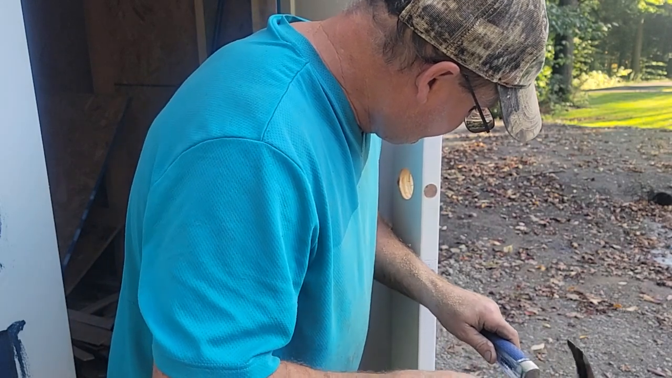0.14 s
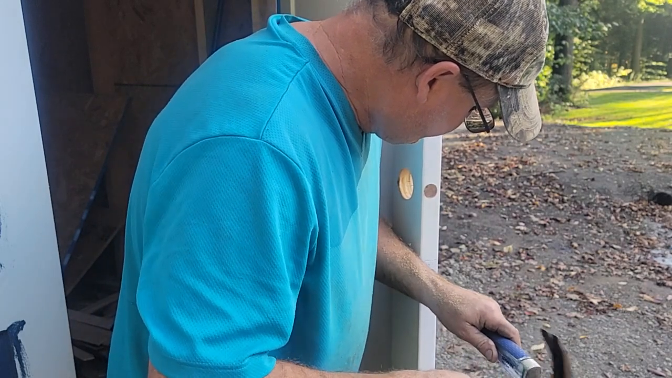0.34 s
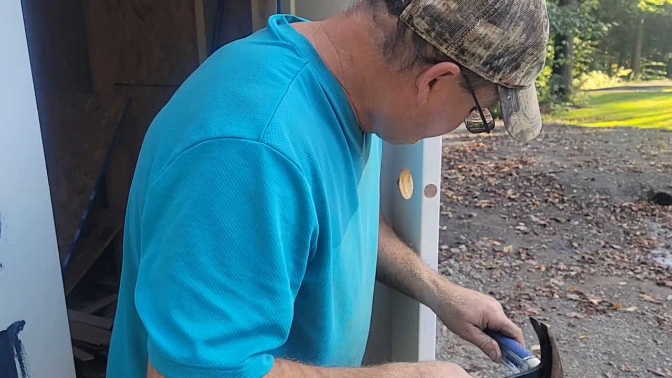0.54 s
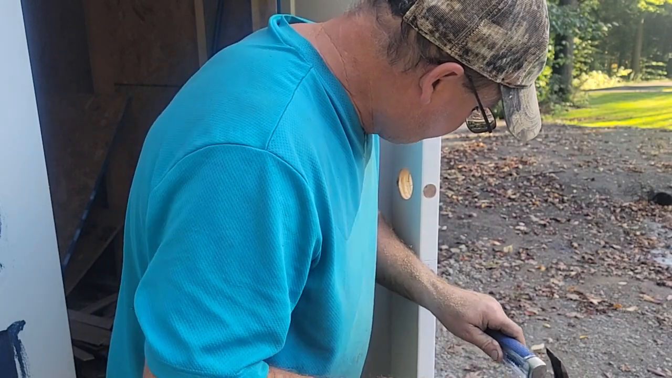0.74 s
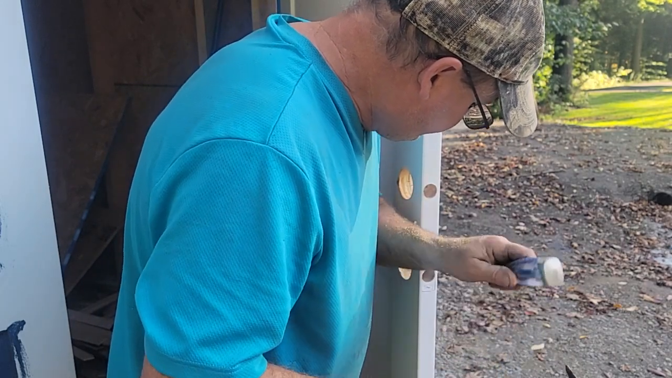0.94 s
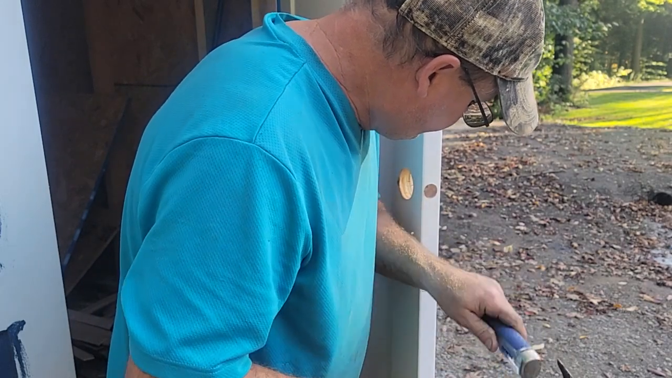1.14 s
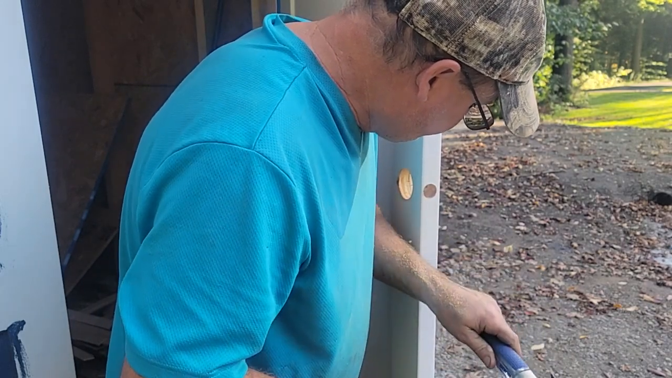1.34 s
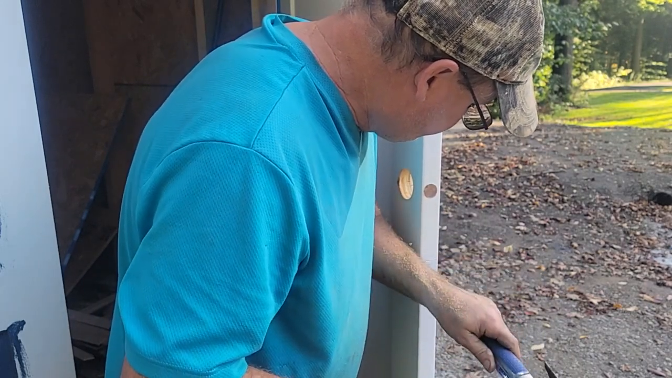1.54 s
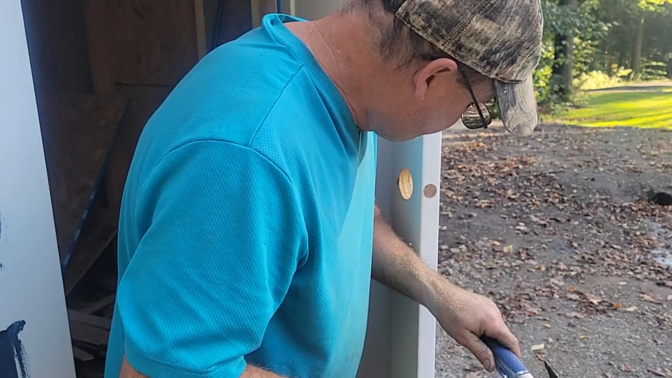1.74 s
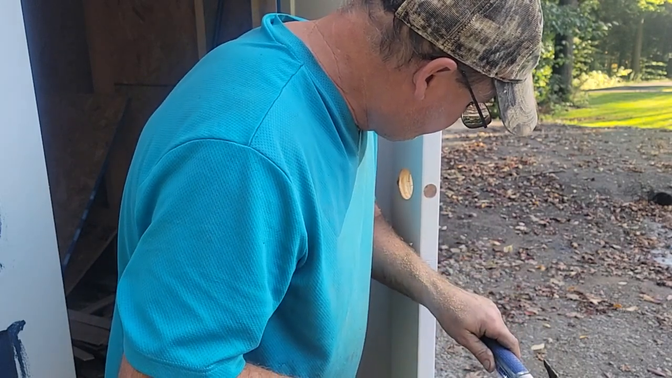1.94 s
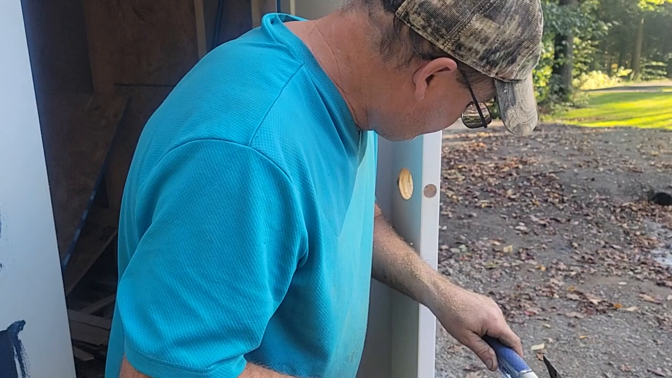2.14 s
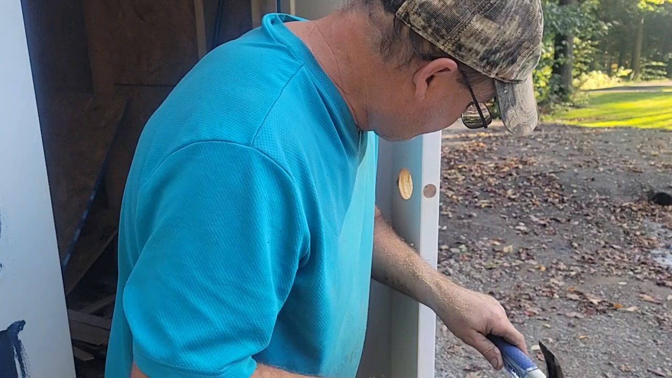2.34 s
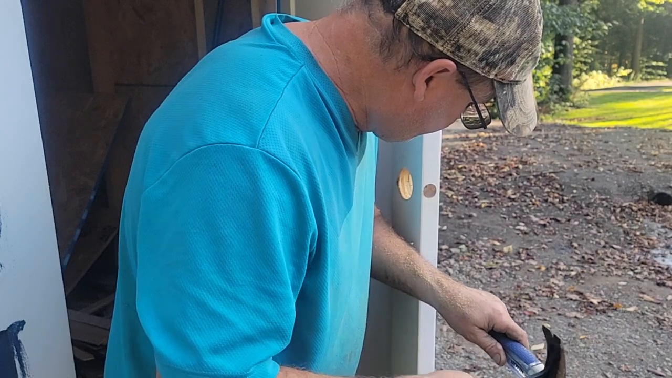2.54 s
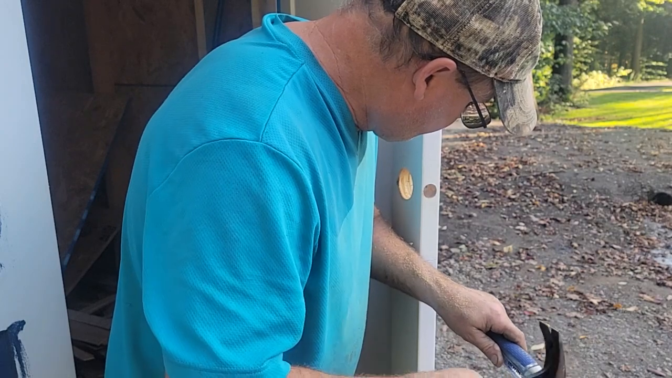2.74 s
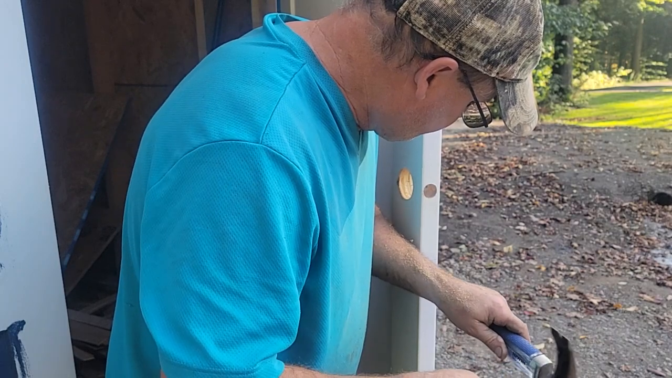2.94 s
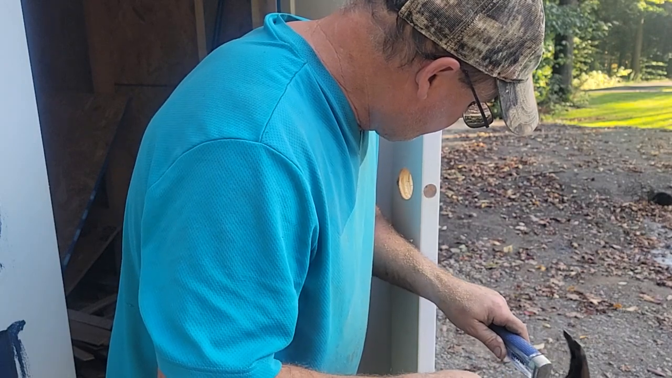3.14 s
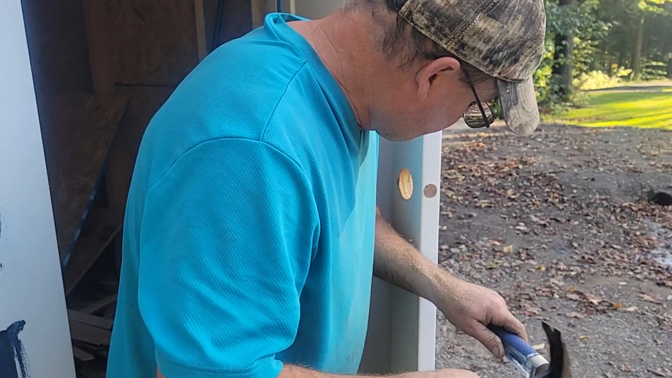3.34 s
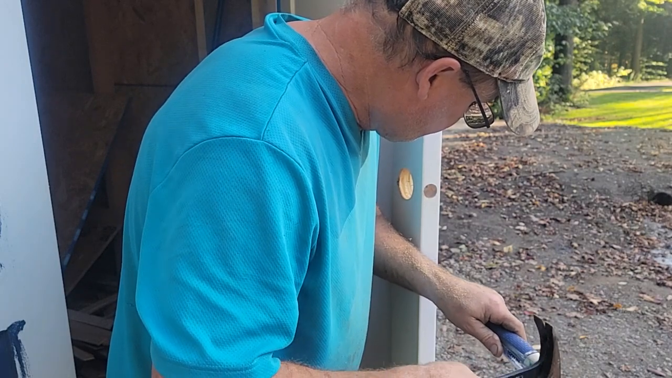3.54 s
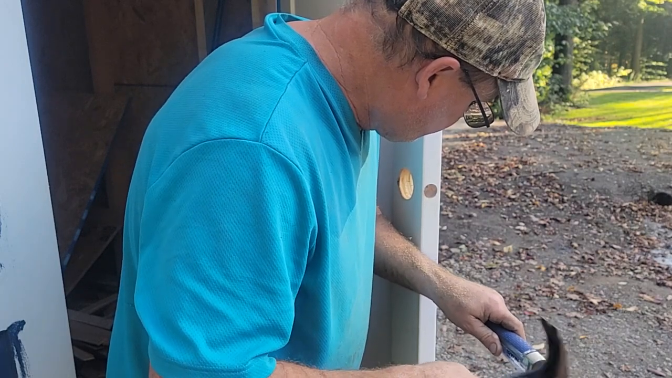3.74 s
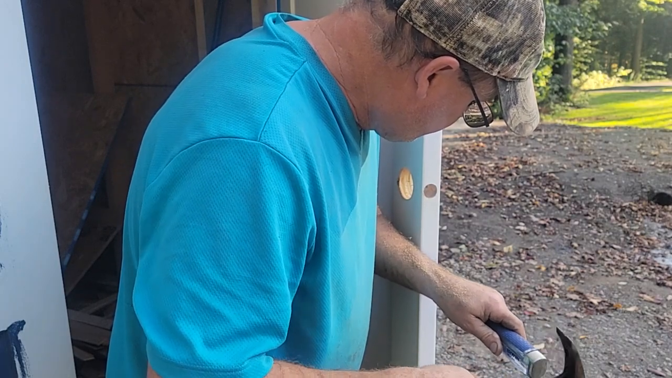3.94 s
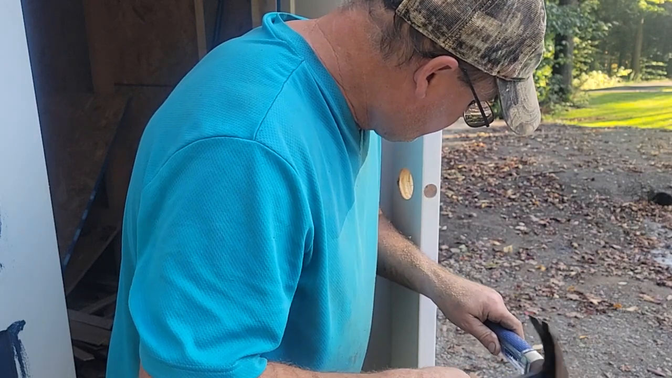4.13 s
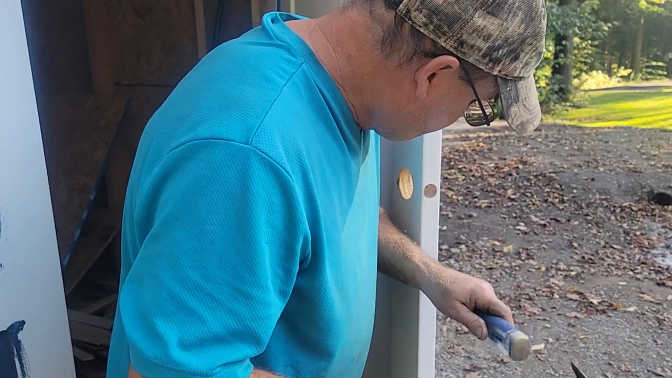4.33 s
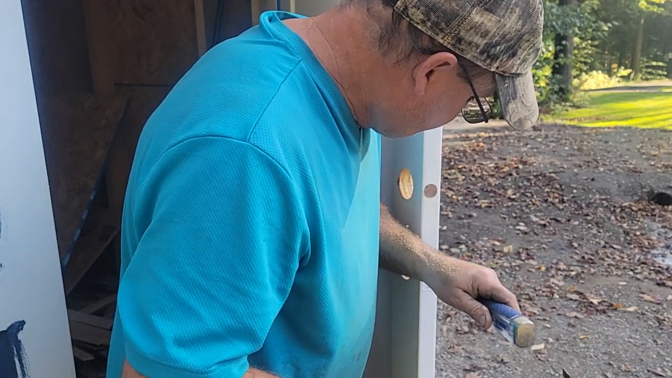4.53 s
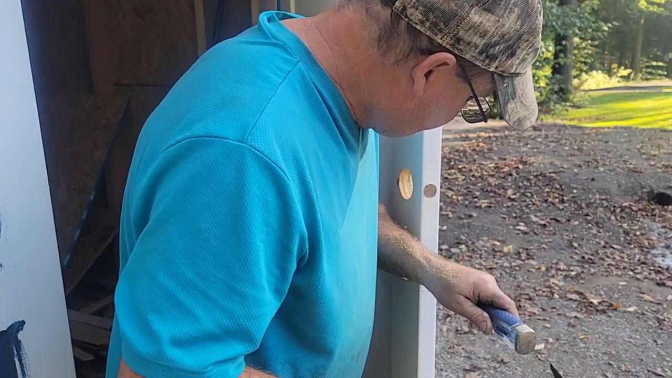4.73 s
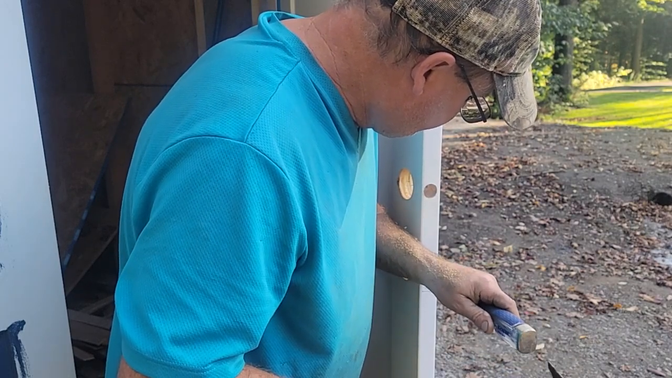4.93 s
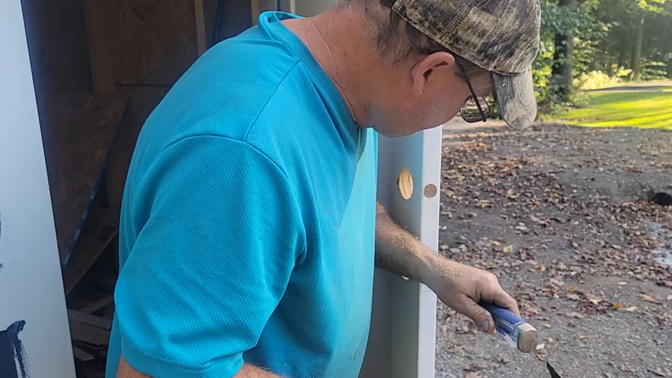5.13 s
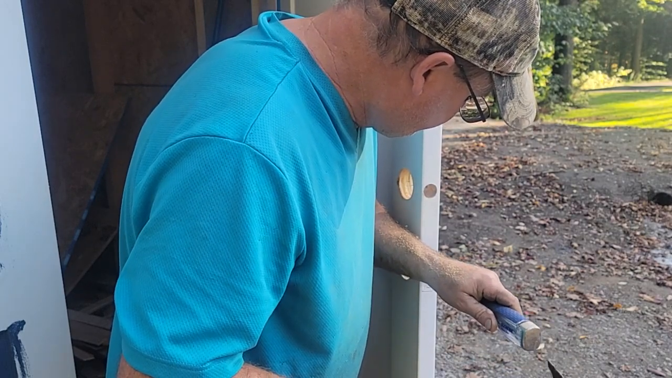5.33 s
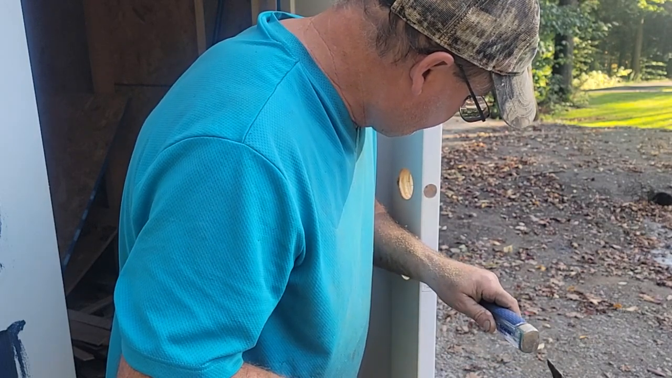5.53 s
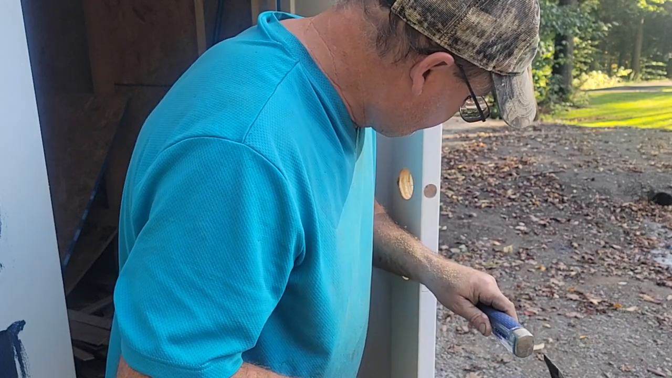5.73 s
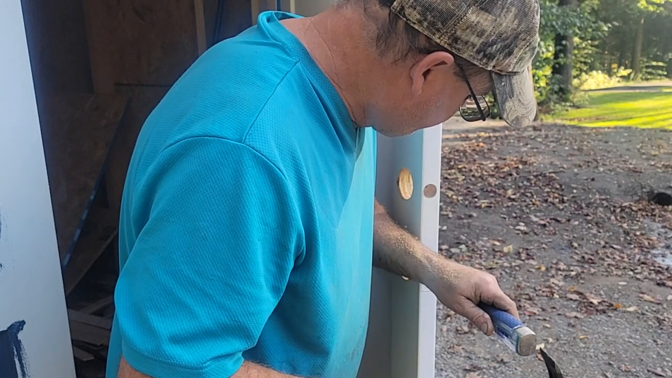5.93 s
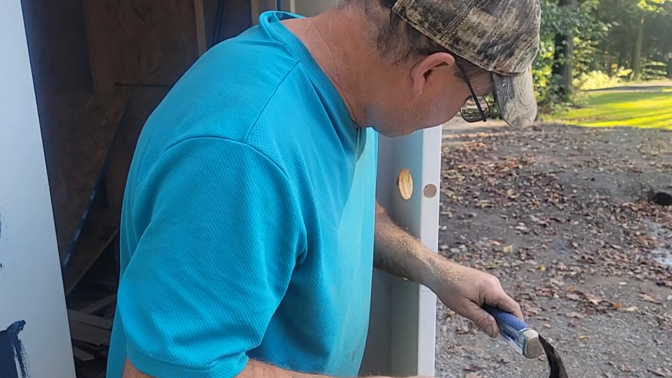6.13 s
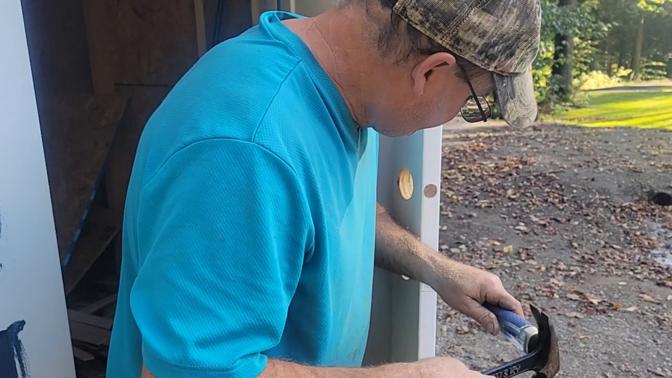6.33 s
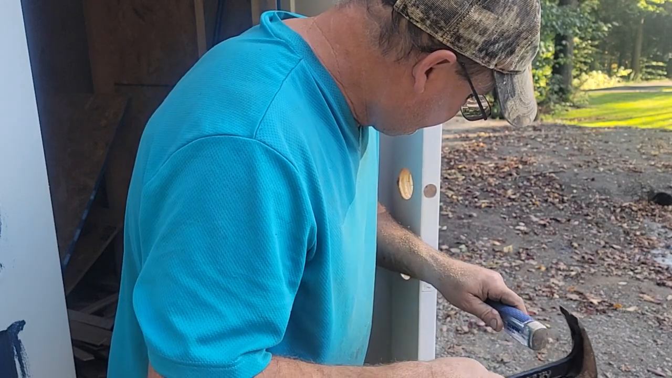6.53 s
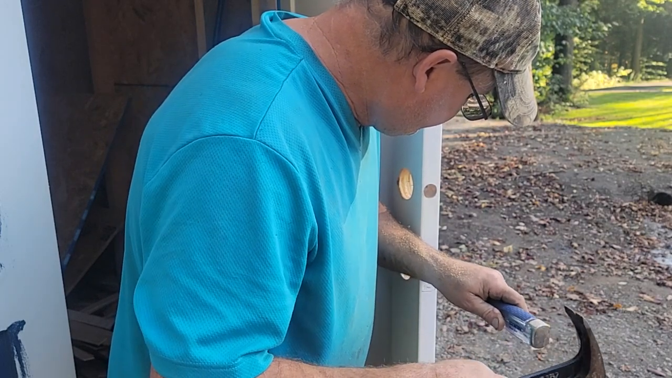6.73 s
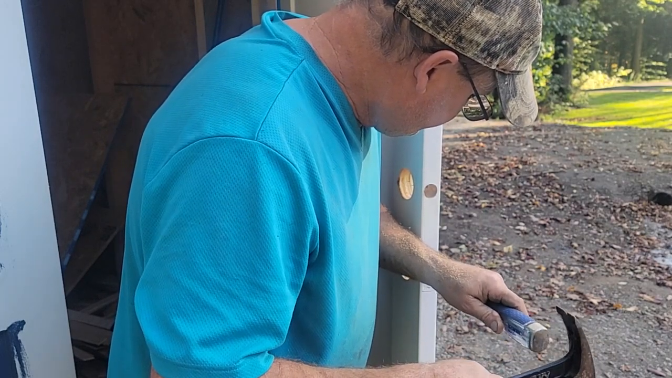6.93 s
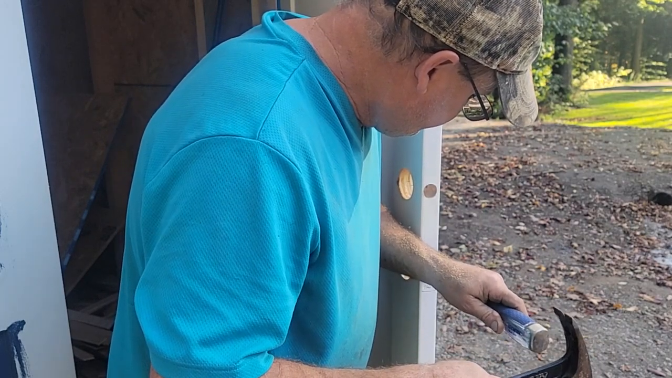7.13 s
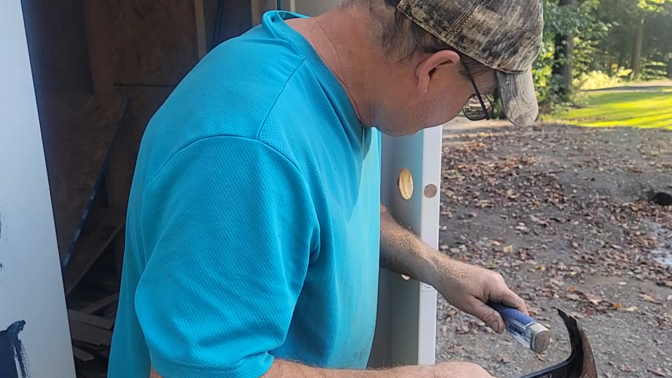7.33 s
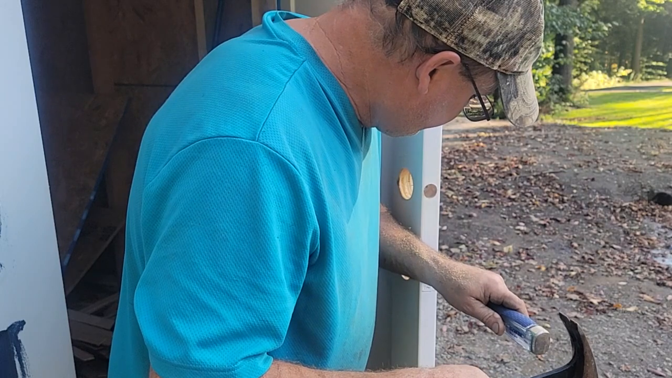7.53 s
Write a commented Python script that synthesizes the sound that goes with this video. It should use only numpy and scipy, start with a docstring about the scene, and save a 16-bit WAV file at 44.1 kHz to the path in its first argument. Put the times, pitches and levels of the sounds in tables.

```python
"""A steel hammer drives a wood chisel into the door frame of a shed. An earlier blow is still ringing out
over far traffic, a droning engine, a low rumble and thin insect hiss when the next one lands. Each blow
cracks, rings the tools and sets the frame and wall booming; the shed reverberates and the yard returns
a faint echo. The chisel clicks as it is handled, then seven blows come in a run while the engine slows.
A high insect sizzles, one last blow falls, and the insect calls again."""
import sys
import numpy as np
from scipy import signal
from scipy.fft import rfft, irfft, next_fast_len
from scipy.io import wavfile
from scipy.ndimage import uniform_filter1d

SR = 44100
rng = np.random.default_rng(int(sys.argv[2]) if len(sys.argv) > 2 else 0)


def generate_wav(sig):
    """Save sig (samples, or channels by samples) to the path in sys.argv[1] as 16-bit PCM at SR."""
    pcm = np.round(np.clip(np.atleast_2d(sig).T, -1, 1) * 32767).astype(np.int16)
    wavfile.write(sys.argv[1], SR, pcm)


N = 333837
T = np.arange(SR) / SR  # the one second in which a hit rings out
SCENE_T = np.arange(N) / SR

# tone of cracking wood: pitch_hz, level_db
WOOD_TONE = [(60, -42.5), (250, -20), (500, -13), (850, -6), (1200, -5.5), (1650, -1.5), (2200, -1),
             (2650, -4), (3200, 1), (4700, 0), (5300, -1.5), (7300, -3.5), (7900, -17), (16000, -40)]
# tone of a bright tick: pitch_hz, level_db
TICK_TONE = [(500, -37.5), (3000, -27), (7000, -7.5), (8100, -12), (9300, -12.5), (10000, -9),
             (11300, -8.5), (12600, -1.5), (13700, -6.5), (15300, -9.5), (16500, -23.5)]


def undb(db):
    """Turn decibels into a gain."""
    return 10 ** (np.asarray(db) / 20)


def at(points, hz):
    """Read a table between its rows, on a log pitch scale."""
    pitches, values = np.transpose(points)
    return np.interp(np.log(hz + 1), np.log(pitches), values)


def colour(x, points):
    """Filter x with a curve of pitch_hz, level_db."""
    n = 2 * x.shape[-1]
    cepstrum = irfft(np.log(undb(at(points, np.fft.rfftfreq(n, 1 / SR)))))
    # folded so that nothing sounds ahead of the hit
    cepstrum[1:n // 2] *= 2
    cepstrum[n // 2 + 1:] = 0
    return irfft(rfft(x, n) * np.exp(rfft(cepstrum)))[..., :n // 2]


def burst(x, db):
    """Give a hit the energy of level db held for 50 ms."""
    return x * undb(db) / np.sqrt(np.mean(x ** 2) * len(T) / (.05 * SR))


def fade(t60):
    """Die away by 60 dB in t60 seconds."""
    return np.exp(-np.log(1000) * T / t60)


def delay(x, s):
    """The same sound s seconds later."""
    return np.pad(x, ((0, 0), (int(round(s * SR)), 0)))[:, :x.shape[1]]


def add(out, x, start_s):
    """Mix x into out at start_s."""
    i = int(round(start_s * SR))
    a, b = max(i, 0), min(i + x.shape[-1], N)
    out[:, a:b] += x[:, a - i:b - i]


def diffuse(n, apart_hz=650):
    """Noise from all around: left and right are alike in the bass, unrelated in the treble."""
    mid, side = rfft(rng.standard_normal((2, n)))
    alike = .95 / (1 + (np.fft.rfftfreq(n, 1 / SR) / apart_hz) ** 4)
    spectrum = mid * np.sqrt(1 + alike) + np.array([[1], [-1]]) * side * np.sqrt(1 - alike)
    return irfft(spectrum, n) / np.sqrt(2)


def direct(spread):
    """Noise that arrives first on the right, then duller on the left, partly scattered."""
    right = rng.standard_normal(len(T))
    left = (np.roll(right, 3) + np.roll(right, 4)) / 2
    return np.array([left, right]) + spread * diffuse(len(T))


def walk(rate_hz):
    """Slow random wavering, about 1 in size."""
    k = int(SR / rate_hz)
    steps = np.repeat(rng.standard_normal(N // k + 1), k)
    return uniform_filter1d(uniform_filter1d(steps, k), k)[:N] * np.sqrt(2)


def bed(tone, db, waver_db):
    """A distant, wavering noise."""
    n = next_fast_len(N, real=True)
    noise = irfft(rfft(diffuse(n)) * undb(at(tone, np.fft.rfftfreq(n, 1 / SR))), n)[:, :N]
    return noise / noise.std() * undb(db + waver_db * walk(12))


def ring(notes, scatter_db, detune, spread):
    """The fading notes of a struck object, a little different with each grip and place of the cut."""
    out = np.zeros((2, len(T)))
    for hz, db, t60 in notes:
        size, shift, turn, start = rng.standard_normal(4)
        apart = np.array([[2 * np.pi * hz * 4 / SR + spread * turn], [0]])
        wave = np.sin(2 * np.pi * hz * (1 + detune * shift) * T - apart)
        out += np.sign(start) * undb(db + scatter_db * size) * fade(t60) * wave
    return out


def reflect(x, tone, smear_t60):
    """A surface scatters the sound into a smeared, recoloured copy."""
    scatter = diffuse(len(T)) * fade(smear_t60)
    scatter = colour(scatter / np.sqrt(np.sum(scatter[0] ** 2)), tone)
    return signal.fftconvolve(x, scatter, axes=1)[:, :x.shape[1]]


def cut(x, hz, width_hz=400):
    """The wood round the cut lifts one band of pitch."""
    return x + signal.lfilter(*signal.iirpeak(hz, hz / width_hz, fs=SR), x)


def edge(x, steel_db):
    """The harder the steel contact, the brighter the top of the sound."""
    return colour(x, [(5000, 0), (6500, steel_db)])


def steel_tick(db, rise_s=.0028):
    """Steel meets steel with a short, bright tick."""
    tick = colour(direct(spread=.5) * fade(.024), TICK_TONE)
    return burst(tick, db) * (1 - np.exp(-T / rise_s))


def wood_snap(grain, cut_hz, db):
    """Wood fibres snap: a sharp crack with a softer tail, part shared grain and part fresh noise."""
    fibres = (grain + direct(spread=.47)) * (fade(.013) + undb(-10) * fade(.08))
    return burst(cut(colour(fibres, WOOD_TONE), cut_hz), db)


def tool_ring(db):
    """The hammer head and the gripped chisel ring briefly."""
    # steel notes: pitch_hz, level_db, fade_s
    notes = [(2950, -5, .06), (3141, -7, .14), (3310, -4, .07), (3535, -7, .13), (3699, -9, .1),
             (4000, -4, .06), (4290, -5, .08), (4935, 3, .05), (6370, 0, .025), (6950, 2, .02),
             (7150, 4, .025)]
    return burst(ring(notes, scatter_db=1, detune=.004, spread=3.2), db)


def frame_knock(db):
    """The push passes through the blade and knocks the door frame."""
    # wooden notes: pitch_hz, level_db, fade_s
    notes = [(420, -9, .25), (455, -11, .22), (559, -11, .33), (695, -10, .33), (760, -10, .15),
             (857, -9, .28), (928, -6, .22), (992, -9, .25), (1065, -2, .12), (1119, 0, .14), (1200, 3, .1),
             (1260, 0, .08), (1360, -3, .14), (1442, 2, .14), (1600, -1, .1), (1662, -1, .12),
             (1921, -6, .13), (2040, -1, .07), (2167, 0, .09), (2400, -2, .08)]
    knock = burst(ring(notes, scatter_db=5.5, detune=.0094, spread=.34), db)
    return knock * undb([[-.7], [.7]])  # slightly to the right


def blade_ring(db):
    """The blade rings when it sits loosely in the cut."""
    # blade notes: pitch_hz, level_db, fade_s
    notes = [(4430, -1, .2), (4520, -6, .24), (5985, -5, .26), (6480, -7, .16), (6870, -5, .16),
             (7130, 5, .035), (7210, -8, .22), (7810, -17, .12), (11900, -6, .06)]
    return burst(ring(notes, scatter_db=1, detune=.001, spread=.6), db)


def wall_boom(travel_s=.006, swell_s=.0047, scatter_db=1.25):
    """Bending waves spread from the frame into the wall; low notes arrive later and swell more slowly."""
    # wall notes: pitch_hz, level_db, fade_s
    notes = [(30, -11, .8), (38, -8, .8), (49, -7, .6), (67, -11, .5), (95, -8, .4), (123, -3, .4),
             (145, 0, .45), (167, -11, .4), (188, -5, .35), (202, -3, .3), (214, -6, .35), (234, -4.5, .48),
             (255, -6, .4), (278, -8, .48), (293, -6, .45), (316, -10, .35), (346, -12, .48),
             (368, -12, .3)]
    out = np.zeros((2, len(T)))
    for k, (hz, db, t60) in enumerate(notes):
        slow = np.sqrt(150 / hz)  # travel_s and swell_s hold at 150 Hz
        t = np.maximum(T - travel_s * slow, 0)
        shape = (1 - np.exp(-t / (swell_s * slow ** 2))) * np.exp(-np.log(1000) * t / t60)
        apart = np.array([[0], [(.22 + hz / 1500) * (-1) ** (k // 2)]])
        gain = (-1) ** k * undb(db + scatter_db * rng.standard_normal())
        out += gain * shape * np.sin(2 * np.pi * hz * t + apart)
    return out


def shed_reflections(build_s=.0017):
    """Sound bounces densely around the shed; the bass lasts longest."""
    # how long the shed rings: pitch_hz, fade_s
    bands = [(100, 1), (300, 0.59), (800, 0.38), (2000, 0.36), (3400, 0.21), (6000, 0.56), (12000, 0.46)]
    spectrum, hz = rfft(diffuse(len(T))), np.fft.rfftfreq(len(T), 1 / SR)
    centres, t60s = np.transpose(bands)
    weights = (at(np.c_[centres, row], hz) for row in np.eye(len(centres)))
    tail = sum(irfft(spectrum * weight, len(T)) * fade(t60) for weight, t60 in zip(weights, t60s))
    return tail * (1 - np.exp(-T / build_s))


def shed_answer(reflections, ringing, cut_hz, steel_db, db):
    """The shed answers the snap broadly and holds the ringing notes of frame and tools."""
    # tone of the broad answer: pitch_hz, level_db
    shed_tone = [(60, 4.5), (200, 4), (450, -4.5), (900, -0.5), (1600, -2.5), (2100, -6.5), (2600, -6.5),
                 (3300, 0), (4600, -5.5), (5600, -15), (7300, -11.5), (8000, -28), (15500, -40)]
    # which notes stay in the shed: pitch_hz, level_db
    held_tone = [(400, -6.5), (1200, 1), (3700, 7.5), (4900, -9.5), (6500, -15.5), (8000, -32.5)]
    broad = edge(burst(cut(colour(reflections, shed_tone), cut_hz), db), steel_db)
    held = signal.fftconvolve(reflections, colour(ringing, held_tone), axes=1)[:, :len(T)]
    return broad + burst(held, db - 4)


def tearing(reflections, db):
    """Torn fibres leave a bright wash, and a thin ringing lingers in the shed."""
    # tone of the lingering ring: pitch_hz, level_db
    linger_tone = [(1500, -35), (2700, -15), (3100, -5), (3450, -4), (3900, -8), (4700, -16.5), (7000, -23),
                   (8000, -41.5)]
    tear = burst(colour(diffuse(len(T)) * fade(.1), TICK_TONE), db)
    wash = burst(colour(reflections, TICK_TONE), db - 12.5)
    linger = burst(colour(diffuse(len(T)), linger_tone) * fade(.91), db - 13)
    return (tear + wash) * undb([[-1.5], [1.2]]) + linger


def rebound(hit, after_s=.0053, db=-11):
    """The hammer bounces and touches the chisel a second time."""
    return (hit + undb(db) * delay(hit, after_s)) / np.hypot(1, undb(db))


def doorway(snap, after_s=.0145):
    """The far side of the doorway throws back a dull copy that thickens the snap."""
    return undb(-11) * delay(reflect(snap, [(4500, .5), (6000, -11)], smear_t60=.04), after_s)


def yard_echo(x, after_s=.242):
    """The far side of the yard returns a faint, dull, smeared copy."""
    tone = [(300, -2), (2000, 8), (5000, 0), (12000, -11)]
    return undb(-44) * delay(reflect(x, tone, smear_t60=.14), after_s)


def hammering(tick_lead_s=.0014, contact_s=.0004, swell_s=.003):
    """Hammer blows: a stalled blade snaps, a biting one shakes the wall and tears fibres."""
    # blows, the first before time zero:
    # start_s, force_db, bite (0-1), steel_hardness_db, blade_looseness (0-1), cut_pitch_hz
    blows = [(-.085, 1, 0.83, 2, 0, 3200), (0.1773, 2, 0.6, -0.5, 0, 3230), (2.4276, -10, 0, -1, .25, 1960),
             (2.696, -1.5, 0.04, 0.5, .1, 1900), (2.9345, -4, 0.35, 5.5, .7, 4420),
             (3.1984, -2.2, 0.58, 3.5, .05, 3200), (3.457, -2, 0.8, 3, .05, 3336),
             (3.7233, -0.3, .5, 1.5, .05, 1155), (3.971, -0.53, 0.67, 2, .05, 3450),
             (6.2917, -3, 0.04, -3, 0, 2327)]
    out = np.zeros((2, N))
    grain, room = direct(spread=2), shed_reflections()  # the same wood and shed for every blow
    for start_s, force_db, bite, steel_db, loose, cut_hz in blows:
        def level(stalled_db, biting_db):
            """Level of one part of this blow, between a stalled blade and a full bite."""
            return force_db + stalled_db + (biting_db - stalled_db) * bite

        snap = edge(wood_snap(grain, cut_hz, level(-20.5, -25)), steel_db)
        tick = undb(steel_db) * steel_tick(level(-24, -23.5))
        tools = tool_ring(level(-35, -28.5))
        crack = (snap + undb(steel_db) * tools) * (1 - np.exp(-T / contact_s))
        # the steel ticks just before the wood gives
        add(out, rebound(tick + delay(crack, tick_lead_s)), start_s - tick_lead_s)

        knock = frame_knock(level(-31, -33.5))
        body = knock * (1 - np.exp(-T / swell_s)) + loose * blade_ring(force_db - 23.5)
        body += burst(wall_boom(), level(-34.5, -25.5))

        reflections = room + .5 * shed_reflections()
        tail = shed_answer(reflections, knock + tools, cut_hz, steel_db, level(-34.5, -28))
        tail += doorway(snap) + tearing(reflections, level(-38, -25))
        add(out, body + tail, start_s)
    return out + yard_echo(out)


def engine(level_db=-66.5):
    """A far engine hums one unsteady note that sinks as it slows."""
    # engine note: time_s, pitch_hz
    pitches = [(0, 104.7), (2.5, 104.8), (4.3, 90.9), (7.57, 86.57)]
    hz = np.interp(SCENE_T, *np.transpose(pitches)) * (1 + .018 * walk(14))
    hum = np.sqrt(2) * np.sin(2 * np.pi * np.cumsum(hz) / SR)
    return hum * undb(level_db + 2.5 * walk(36))


def traffic(start_db=-68.5, rise_db_per_s=.7663):
    """Far traffic draws slowly nearer."""
    # traffic noise: pitch_hz, level_db
    tone = [(100, -5), (200, 0.5), (400, -3.5), (900, -1.5), (1300, -6), (2000, -15), (3500, -13.5),
            (7000, -17), (8200, -37)]
    return bed(tone, start_db + rise_db_per_s * SCENE_T, waver_db=.5)


def insect_chorus(level_db=-75):
    """Insects trill steadily over a soft outdoor hiss."""
    # soft hiss: pitch_hz, level_db
    hiss_tone = [(1500, -8), (3200, -2), (4500, -2), (6000, -1), (7400, -3), (8000, -25), (8700, -22),
                 (9600, -14), (12000, -6), (15500, -6)]
    # insect trill: pitch_hz, level_db
    trill_tone = [(3800, -30), (4500, -11), (4950, 0), (5300, -9), (6000, -24)]
    return bed(hiss_tone, level_db, waver_db=.2) + bed(trill_tone, level_db, waver_db=1)


def rumble():
    """A low rumble swells and sinks."""
    # deep noise: pitch_hz, level_db
    tone = [(20, -15), (38, 0.5), (52, 2), (70, -1.5), (100, 1.5), (140, -13), (250, -27), (600, -59)]
    # its slow swells: time_s, level_db
    levels = [(0, -54.5), (1.3, -64.5), (2.2, -56.5), (4.4, -57.5), (4.9, -66), (6.2, -63.5), (7.2, -59)]
    return bed(tone, np.interp(SCENE_T, *np.transpose(levels)), waver_db=4.5)


def handling():
    """The chisel ticks lightly against the wood as it is handled."""
    # small clicks: start_s, level_db
    clicks = [(0.7702, -63.5), (.779, -73), (1.401, -74)]
    out = np.zeros((2, N))
    for start_s, db in clicks:
        scrape = direct(spread=1) * fade(.05)
        click = colour(scrape, WOOD_TONE) + .69 * colour(scrape, TICK_TONE)
        add(out, burst(click, db), start_s)
    return out


def sizzling_insect(attack_s=.13, release_s=.44):
    """Each call of a high insect swells quickly and dies away."""
    # insect calls: start_s, length_s, level_db
    calls = [(4.616, 0.73, -73), (7.219, .65, -76)]
    # high sizzle: pitch_hz, level_db
    tone = [(5000, -59), (8500, -32), (11000, -7.5), (12800, 2), (15500, -9)]
    loudness = np.zeros(N)
    for start_s, length_s, db in calls:
        t = SCENE_T - start_s
        loudness += undb(db) * np.clip(np.minimum(t / attack_s, (length_s - t) / release_s), 0, 1)
    return loudness * bed(tone, 0, waver_db=.5)


def scene():
    """Chisel work in front of the quiet yard."""
    work = hammering() + handling()
    yard = engine() + traffic() + insect_chorus() + rumble() + sizzling_insect()
    return work + yard


def record(dry):
    """Round off the highest peaks and cut the treble above 15900 Hz."""
    rounded = np.tanh(.7 * dry) / .7
    return signal.sosfilt(signal.ellip(8, .2, 70, 15900, fs=SR, output="sos"), rounded)


dry = scene()
out = record(dry)
generate_wav(out)
```